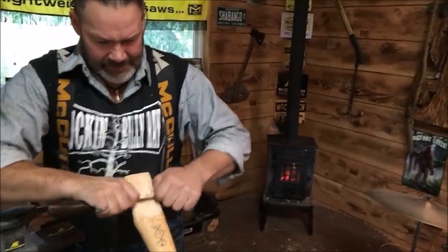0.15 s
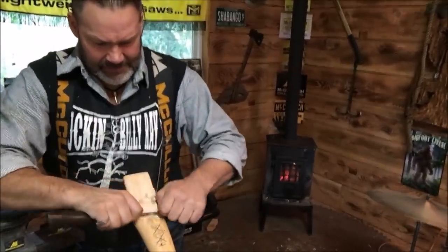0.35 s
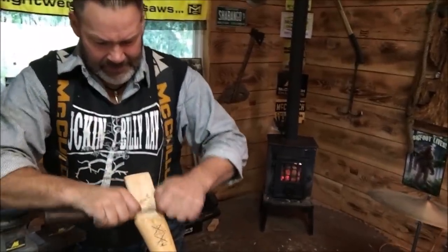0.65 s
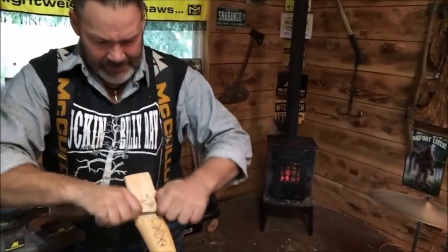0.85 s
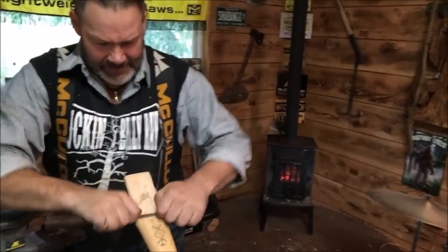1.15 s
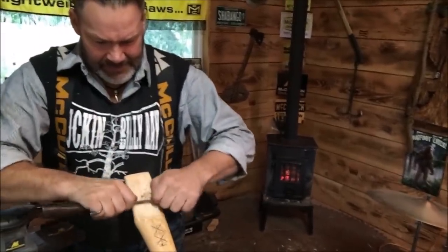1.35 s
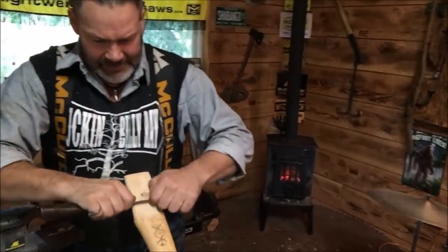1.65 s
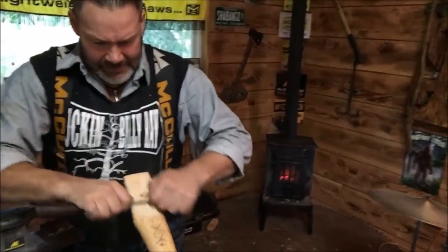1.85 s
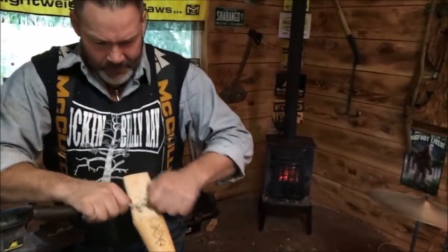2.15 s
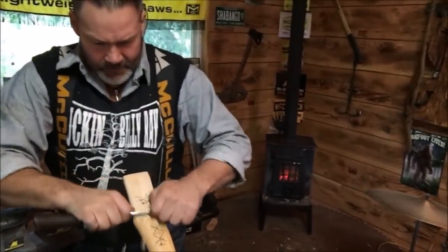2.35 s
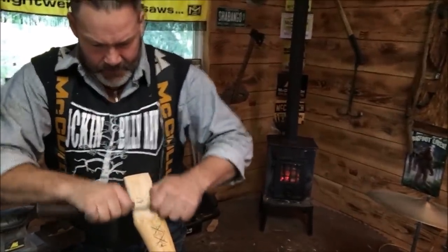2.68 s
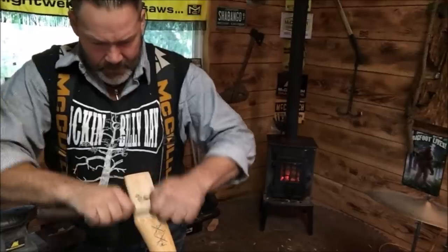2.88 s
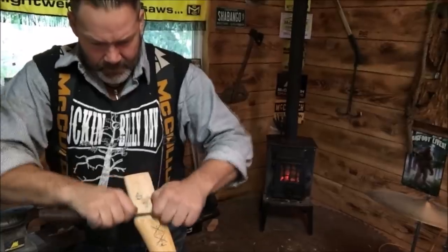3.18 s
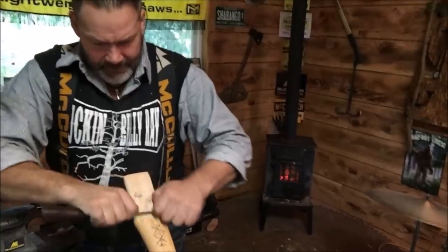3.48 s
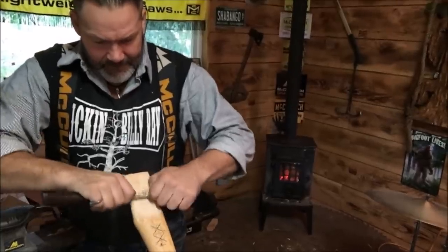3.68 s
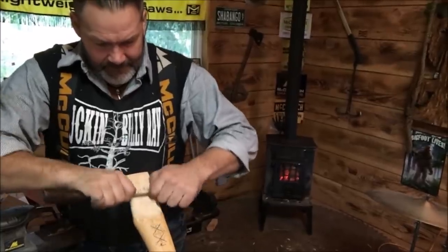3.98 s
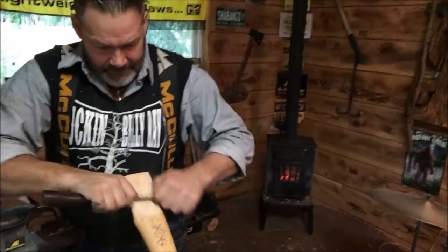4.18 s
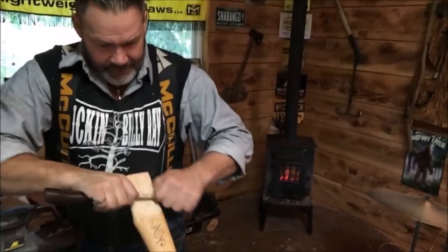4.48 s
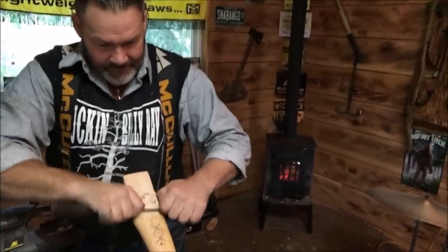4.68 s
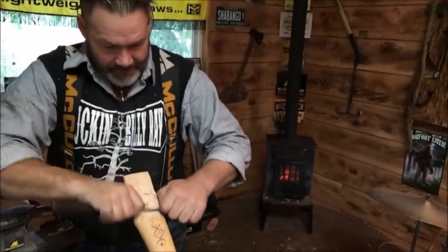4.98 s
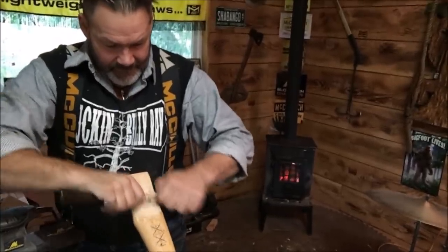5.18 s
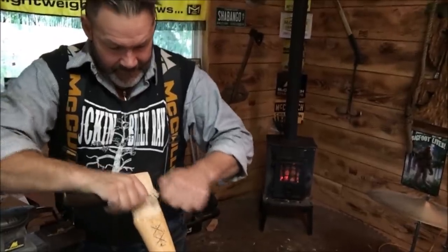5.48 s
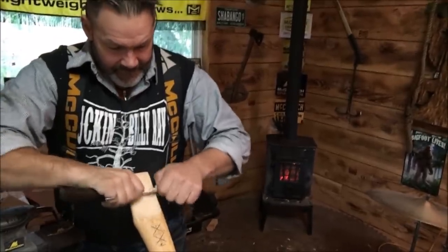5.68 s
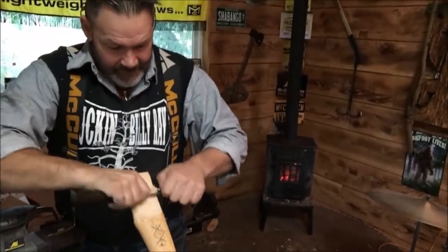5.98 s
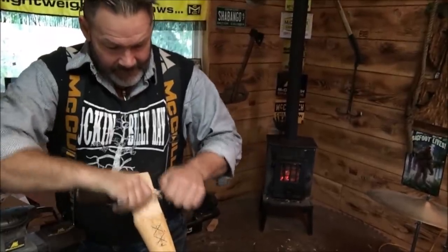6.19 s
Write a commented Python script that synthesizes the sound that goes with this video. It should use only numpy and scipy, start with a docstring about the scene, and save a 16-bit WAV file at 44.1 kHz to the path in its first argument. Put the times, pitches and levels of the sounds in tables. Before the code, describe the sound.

A steel scraper shaves a clamped wooden handle in quick, even, raspy strokes, with clicks and knocks over a faint low hum.

```python
"""A steel scraper shaves a clamped wooden handle in quick, even strokes inside a small timber workshop.
Pulls are dense, clumped fibre clicks that drive the ringing modes of handle and blade, plus fibre fizz.
Around them: set-down knocks, short stick-slip squeaks, catches that flick the blade, a faint early rub.
Sparse reflections carry the tail over a low hum of shaped noise."""
import sys
import numpy as np
from scipy import signal
from scipy.io import wavfile
from scipy.ndimage import uniform_filter1d

SR = 44100
rng = np.random.default_rng(int(sys.argv[2]) if len(sys.argv) > 2 else 0)


def dump(signal):
    """Clip the signal to [-1, 1] and save it as 16-bit WAV at the path in sys.argv[1]."""
    limited = np.clip(np.atleast_2d(signal).T, -1, 1)
    pcm = np.round(limited * 32767).astype(np.int16)
    wavfile.write(sys.argv[1], SR, pcm)


N = 279549
# Rows of the force array: deep handle, middle handle, blade, blade top, fizz, heard directly.


def gain_of(db):
    """Decibels to gain."""
    return 10 ** (np.asarray(db) / 20)


def unit(x):
    """Scales to energy 1."""
    return x / np.sqrt(np.sum(x ** 2) + 1e-30)


def unit_rms(x):
    """Scales to RMS 1."""
    return np.sqrt(len(x)) * unit(x)


def smooth_twice(x, first, second, first_axis=-1, second_axis=-1):
    """Two running means, lengths in samples or bins."""
    return uniform_filter1d(uniform_filter1d(x, first, first_axis), second, second_axis)


def read(points, hz):
    """Reads a table on a log-frequency axis."""
    f, value = np.transpose(points)
    return np.interp(np.log(hz + 1), np.log(f + 1), value)


def level_over_time(curve):
    """Reads a (time, level) table at every sample, in dB."""
    return np.interp(np.arange(N) / SR, *np.transpose(curve))


def add(mix, start_s, sound):
    """Mixes a sound in at start_s."""
    part = mix[..., round(start_s * SR):][..., :sound.shape[-1]]
    part += sound[..., :part.shape[-1]]


# Hum spectrum: (frequency [Hz], relative density [dB per Hz])
HUM_SPECTRUM = [(35, -43), (58, 4), (90, -8), (130, 0), (200, -6.5), (300, -12.5), (1000, -17.5),
                (3000, -28.5), (16000, -53)]
HUM_RMS_DB, HUM_PATCH_DB = -57.5, 3.7


def hum():
    """Steady low rumble of stove and building: shaped noise, slightly patchy in time and pitch."""
    frames, hz = N // 512 + 5, np.fft.rfftfreq(2048, 1 / SR)
    real, imag, patches = rng.standard_normal((frames, 1025, 3)).T
    patches = smooth_twice(patches, 3, 5, 0, 1)
    level_db = read(HUM_SPECTRUM, hz)[:, None] + HUM_PATCH_DB * patches / patches.std()
    noise = signal.istft((real + 1j * imag) * gain_of(level_db), nperseg=2048, noverlap=1536)[1][:N]
    return gain_of(HUM_RMS_DB) * np.sqrt(N) * unit(noise)


# Room decay: (frequency [Hz], t60 [s])
ROOM_DECAY = [(300, 0.22), (700, 0.42), (1030, 0.23), (1500, 0.44), (3000, 0.32), (6000, 0.28),
              (12000, 0.21)]
SET_CHANGES_PER_S = 2.3


def room(x, count=3):
    """Sparse random-sign reflections, t60 per band; several sets cross-fade in steady rotation."""
    out = np.zeros(N)
    place = np.cumsum(np.full(N, SET_CHANGES_PER_S / SR)) % count
    for k in range(count):
        taps = np.zeros(SR // 2)
        at = np.arange(220, len(taps) - 20, 16)
        taps[at + rng.integers(0, 16, len(at))] = rng.choice([-1., 1.], len(at))
        hz, t, z = signal.stft(taps, SR, nperseg=256)
        decay = gain_of(-60 * t / read(ROOM_DECAY, hz)[:, None])
        tail = signal.istft(z * decay, SR, nperseg=256)[1]
        away = abs((place - k + count / 2) % count - count / 2)
        fade = np.cos(np.pi / 2 * np.minimum(away, 1))
        out += signal.fftconvolve(x * fade, unit(tail))[:N]
    return out


GRIP_DETUNE, GRIP_DB = 0.008, 1.5  # spread of mode pitch [share] and strength [dB] as the grip shifts


def ring(modes, rise_s):
    """Response to one tap in one grip: modes alternate in sign; little radiates below the lowest."""
    t, chance = np.arange(8192) / SR, rng.standard_normal((len(modes), 2))
    tap = np.zeros(len(t))
    for k, (hz, db, t60_s) in enumerate(modes):
        decay = gain_of(db + GRIP_DB * chance[k, 0] - 60 * t / t60_s)
        tap += (-1) ** k * decay * np.sin(2 * np.pi * hz * (1 + GRIP_DETUNE * chance[k, 1]) * t)
    tap *= 1 - np.exp(-t / rise_s)
    highpass = signal.butter(4, .75 * modes[0][0], "high", fs=SR, output="sos")
    return unit(signal.sosfilt(highpass, tap))


def body(force, modes, rise_s, count=22):
    """Rings a set of modes; grip and contact point shift in even steps, so the modes shift a little."""
    out, place = np.zeros(N), np.linspace(0, count, N)
    for k in range(count + 1):
        span = np.flatnonzero(abs(place - k) < 1)
        fade = np.cos(np.pi / 2 * (place[span] - k)) ** 2
        add(out, span[0] / SR, signal.fftconvolve(force[span] * fade, ring(modes, rise_s)))
    return out


def shelf(x, hz, side, curve):
    """Lifts or lowers everything on one side of hz by a level curve."""
    part = signal.sosfiltfilt(signal.butter(2, hz, side, fs=SR, output="sos"), x)
    return x + (gain_of(level_over_time(curve)) - 1) * part


# Deep handle modes: (frequency [Hz], relative level [dB], t60 [s])
HANDLE_DEEP_MODES = [(129.6, -6, 0.11), (371.8, 2.5, 0.072), (431.3, 1, 0.086), (524.6, 7.5, 0.045),
                     (632, -6, 0.11), (698.6, -4.5, 0.11)]
# Drive below THUD_HZ: (time [s], level [dB])
THUD_LEVEL = [(0, -12), (2, 2.5), (6.34, -0.5)]
THUD_HZ, THUD_RISE_S = 486, 0.00033


def handle_deep(force):
    """Low modes of the handle; they build up while the clamp takes the blow."""
    return body(shelf(force, THUD_HZ, "low", THUD_LEVEL), HANDLE_DEEP_MODES, THUD_RISE_S)


RING_RISE_S = 0.00025  # middle handle and blade
# Middle handle modes: (frequency [Hz], relative level [dB], t60 [s])
HANDLE_MID_MODES = [(1153, 11.8, 0.049), (1146, 26.5, 0.0046), (1379.4, 14.17, 0.069),
                    (1597, 25.56, 0.0064), (1896, 16.7, 0.0091), (1862, 12, 0.028)]


def handle_mid(force):
    """Middle modes of the handle, as decaying sines."""
    return body(force, HANDLE_MID_MODES, RING_RISE_S)


# Blade modes: (frequency [Hz], relative level [dB], t60 [s])
BLADE_MODES = [(2215, -7.5, 0.12), (2407, -2, 0.2), (2397, 22, 0.0061), (2850, 6.5, 0.042),
               (3000, 13, 0.011), (3423, 12, 0.012), (3603, 9, 0.019), (3734, 4.5, 0.014),
               (4240, -4.5, 0.062), (4233, -0.5, 0.027)]


def blade(force):
    """Main modes of the steel blade, as decaying sines."""
    return body(force, BLADE_MODES, RING_RISE_S)


# Upper blade modes: (frequency [Hz], relative level [dB], t60 [s])
BLADE_TOP_MODES = [(4560, -4, .016), (4900, -3, .01), (5300, 1, .016), (5650, -1, .012), (6000, -2, .009)]


def blade_top(force):
    """Short upper modes of the blade, with a near-instant rise."""
    return body(force, BLADE_TOP_MODES, 1e-5)


def causal(points):
    """Minimum-phase click with the given spectrum."""
    hz = abs(np.fft.fftfreq(4096, 1 / SR))
    log_gain = np.log(gain_of(np.maximum(read(points, hz), -100)))
    return unit(np.fft.ifft(np.exp(log_gain - 1j * signal.hilbert(log_gain).imag)).real[:1024])


# Fizz spectrum: (frequency [Hz], relative density [dB per Hz])
FIZZ_SPECTRUM = [(2700, -30), (4300, 7), (6400, -2.5), (8600, -6.5), (10200, -17), (11800, -14),
                 (14000, -23), (16000, -16)]
# Drive above SHEEN_HZ: (time [s], level [dB])
SHEEN_LEVEL = [(0, 1.5), (2, 9), (3.4, 7), (4.4, 0.5), (6.34, 5.5)]
SHEEN_HZ = 7900


def fizz_air(force):
    """Fibre clicks radiate straight to air; bright spectrum, its treble rising and falling over time."""
    return signal.oaconvolve(shelf(force, SHEEN_HZ, "high", SHEEN_LEVEL), causal(FIZZ_SPECTRUM))[:N]


CLUMP_DB, PATCH_DB = 2.8, 2.8  # spread of fibre clumps in time, colour patches in time and pitch


def fibres(tears_per_s=1800, spread_db=2.5, rub_share=0.82, clump_db=CLUMP_DB):
    """Fibres tear as dense clicks of uneven size over a smoother rub, in clumps a few ms long."""
    sizes = gain_of(spread_db * np.minimum(rng.exponential(1, N), 5))
    tears = sizes * (rng.random(N) < tears_per_s / SR) * rng.choice([-1., 1.], N)
    clumps = smooth_twice(rng.standard_normal(N), 110, 110)
    rub = tears + rub_share * tears.std() * rng.standard_normal(N)
    return unit_rms(rub * gain_of(clump_db * clumps / clumps.std()))


def patchy(x):
    """Colour drifts in patches of some hundred Hz by some tens of ms, as the wood grain changes."""
    z = signal.stft(x, nperseg=256, noverlap=192)[2]
    patches = smooth_twice(rng.standard_normal(z.shape[::-1]).T, 5, 14, 0, 1)
    z = z * gain_of(PATCH_DB * patches / patches.std())
    return unit_rms(signal.istft(z, nperseg=256, noverlap=192)[1][:N])


# Light drag of the blade: (time [s], relative level [dB])
SLIDE_LEVEL = [(0, -60.5), (1.2, -76), (2.5, -74), (3, -67), (4.4, -116), (6.34, -99)]


def slide(force):
    """Faint, uneven rub of the blade on the wood, mostly early, fading to almost nothing later."""
    share_db = np.array([[-6], [0], [-1.5], [-12], [-12]])
    add(force[:5], 0, gain_of(level_over_time(SLIDE_LEVEL) + share_db) * fibres(clump_db=-1.5))


# Edge chatter on landing: (time [s], relative level [dB], slip rate [1/s], length [ms],
# overtone slope [dB per overtone], rattle above level [dB], strong-weak overtone above level [dB])
SQUEAK_EVENTS = [(0.082, -32.5, 1010, 8.6, -7, 9, -12), (0.395, -36.5, 1010, 6.2, -16, 18.5, 5),
                 (1.2766, -28.5, 1060, 12.4, -9.5, 5.5, -6.5), (1.572, -30.5, 1080, 10.4, -22, 4, -12),
                 (1.853, -34.5, 1065, 13.6, -21, 5.5, -22), (2.1494, -31, 1060, 7.8, -12, 8, -4.5),
                 (3.5857, -25.5, 1015, 15, -1.5, 4.5, -23), (4.1984, -28.5, 1020, 6.8, -2.5, 12, 5)]


def squeaks(force):
    """Stick-slip: a short wavering overtone stack, while uneven slips rattle handle and blade."""
    t = np.arange(1500) / SR
    for start_s, db, slip_hz, ms, slope_db, rattle_db, half_db in SQUEAK_EVENTS:
        waver = uniform_filter1d(rng.standard_normal(len(t)), 40) * np.sqrt(40)
        turns = slip_hz * t + .02 * waver
        stack = sum(gain_of(slope_db * k) * np.sin(2 * np.pi * (k + 1) * turns) for k in range(3))
        stack += gain_of(half_db) * np.sin(3 * np.pi * turns)  # strong and weak slips alternate
        swell = np.sin(np.pi * np.clip(1000 * t / ms, 0, 1) ** .8) ** .6
        late = .2 * uniform_filter1d(rng.standard_normal(len(t)), 30) * np.sqrt(30)
        slips = np.diff(np.floor(np.maximum.accumulate(turns + late)), prepend=-1)
        slips = slips * rng.uniform(0.36, 2.05, len(t)) * (1000 * t < ms)
        share_db = np.array([[-20], [0], [-9], [-20], [-22]])
        add(force[5], start_s, gain_of(db) * swell * stack)
        add(force[:5], start_s, gain_of(db + rattle_db + share_db) * slips)


PATTER_PER_MS = 0.035  # bounce strength against the tap


def blow(ms):
    """One contact: a sharp tap plus a dying patter of bounces that dominates long, soft contacts."""
    t = np.arange(1500) / SR
    patter = PATTER_PER_MS * ms * rng.standard_normal(len(t)) * np.exp(-1000 * t / max(ms, .2))
    return unit(patter + (t == 0))


# Blade touches wood: (time [s], relative knock level [dB], deep thud above it [dB],
# blade ring above it [dB], tick above it [dB], contact decay [ms])
LANDING_EVENTS = [(0.646, -28.5, -13, -18, -16.5, 4.5), (0.6773, -28.5, -10, -8.5, -12, 13),
                  (0.9782, -34.5, -7, -29, -14, 11), (1.215, -38.5, -6, -16, -13.5, 25),
                  (1.5358, -33, -9, -25, -14, 9.4), (1.82, -39, -10, -8, -10, 5.3),
                  (2.086, -48, -14, -9, -4, 14), (2.405, -36.5, -11, -14, -14, 4.3),
                  (2.444, -28.5, -21, -16, -18, 10), (2.7373, -27, -22, -21, -25, 0.47),
                  (3.0337, -22, -26, -11.5, -20.5, 1.7), (3.3104, -18.5, -19.5, -6, -23, 1.6),
                  (3.5252, -34, -32, -7, -14, 15), (3.9049, -19, -21, -10.5, -24, 1.2),
                  (4.5004, -16.5, -10.5, 1, -10, 1.7), (4.778, -14.5, -12.5, -2, -15, 1.95),
                  (5.0859, -15, -10, 0.5, -12.5, 0.86), (5.375, -22, -3, -10, -24, 4.7),
                  (5.6714, -15.5, -7, -9.5, -22, 0.46), (5.9519, -16, -8, -2.5, -19, 0.76),
                  (6.2445, -17.5, -4, 0.5, -15.5, 1.4)]


def landings(force, level_db=17, air_db=-9, air_db_per_ms=0.33):
    """Set-down knock on handle and blade; long grazing contacts hiss more."""
    for start_s, db, deep_db, blade_db, tick_db, ms in LANDING_EVENTS:
        hiss_db = tick_db + air_db + air_db_per_ms * ms
        share_db = np.array([[deep_db], [0], [blade_db], [tick_db], [hiss_db]])
        add(force[:5], start_s, gain_of(level_db + db + share_db) * blow(ms))


# Edge catches a fibre and snaps free: (time [s], relative blade ring [dB],
# handle ring above it [dB], deep thud above it [dB], tick above it [dB])
CATCH_EVENTS = [(0.1626, -9.5, -11, -10, -30), (0.18, -5, -33, -24, -31), (0.1994, -14, -32, -30, -43),
                (0.2134, -1, -17, -21, -16.5), (0.262, -25, -4, 6.5, -30), (0.4814, -5, -24, -3.5, -20),
                (0.5298, -9.5, -3.5, -2, -13), (0.7704, -10, -7, -12, -9), (0.798, -20, 0, -22, -30),
                (0.8539, -8.5, -6.5, -6.5, -14.5), (1.1152, -11, -12, -24, -17),
                (1.369, -16.5, -16, -25, -13), (1.4283, -10, -6, -7, -15), (1.706, -14.5, -16, -7, -39),
                (1.9832, -11, -37, -11.5, -12.5), (2.2415, -22, -20, -25, -24),
                (2.2921, -13.5, -30, -25, -14), (2.492, -6.5, -9, -17.5, -17), (2.57, -18, -30, -20, -14.5),
                (2.8482, -15, -35, -40, -16), (3.384, -28, -52, -25, -36), (3.419, -17, -30, -33, -10.5),
                (3.708, -19, -26, -29, -9), (4.0641, -19.5, -7.5, -5.5, -35), (4.598, -17.5, -22, -27, -23),
                (4.8865, -16, -7.5, -16, -47), (5.18, -28.5, 7.5, 2, 6.5), (5.475, -16.5, 0, 1, -8.5),
                (5.7508, -13.5, -3, 1, -7), (5.989, -17, -23, -29, -15), (6.0293, -15.5, -5.5, 0.5, -6.5),
                (6.275, -29, -14, 16.5, -26)]
SNAP_MS, TICK_MS = 1.6, 5.6  # fibres crackle a little longer than the snap


def catches(force, level_db=9, top_db=-6):
    """A snapping fibre flicks the blade and jolts the handle."""
    for start_s, db, handle_db, deep_db, tick_db in CATCH_EVENTS:
        share_db = np.array([[deep_db], [handle_db], [0], [tick_db + top_db], [tick_db]])
        snap, tick = blow(SNAP_MS), blow(TICK_MS)
        add(force[:5], start_s, gain_of(level_db + db + share_db) * np.array([snap, snap, snap, tick, tick]))


def resonate(x, hz, width_hz):
    """A resonance that follows the curve hz: shift down, smooth twice, shift back."""
    turn, r = np.exp(2j * np.pi * np.cumsum(hz) / SR), np.exp(-np.pi * width_hz / SR)
    return (turn * signal.lfilter([1], np.poly([r, r]), x / turn)).real


# Pulls: (start [s], length [s], digging-in [s], relative blade ring before dig-in loss [dB],
# its change by the lift [dB], mid-pull fizz [dB], mid-pull handle ring [dB], mid-pull shaving resonance [Hz])
PULL_EVENTS = [(0, 0.051, 0.042, -26, -46, -69.5, -61.5, 2490),
               (0.148, 0.099, 0.038, -23.5, -4.5, -38.5, -43.5, 3130),
               (0.468, 0.1, 0.031, -18, -37, -47, -51.5, 2830),
               (0.752, 0.099, 0.022, -33.5, -1, -49.5, -50.5, 2970),
               (1.054, 0.11, 0.0087, -32, -13, -51, -45.5, 3080),
               (1.352, 0.1, 0.014, -39.5, 5.5, -50, -45, 3080),
               (1.635, 0.12, 0.021, -40, -4, -54.5, -50, 2780),
               (1.923, 0.11, 0.017, -34, -7, -53.5, -54.5, 3320),
               (2.225, 0.11, 0.0017, -39, -6, -54, -42.5, 2550),
               (2.489, 0.13, 0.0077, -32.5, -22, -58.5, -48.5, 2480),
               (2.784, 0.13, 0.01, -40, -3, -51.5, -46.5, 2970),
               (3.077, 0.12, 0.038, -33, -24.5, -54, -54, 2630),
               (3.359, 0.11, 0.015, -36.5, -3, -48.5, -47.5, 3340),
               (3.654, 0.11, 0.019, -37.5, -5, -47.5, -50, 2990),
               (3.956, 0.14, 0.0072, -38.5, -4.5, -48.5, -49.5, 3340),
               (4.245, 0.13, 0.015, -37, -7, -46.5, -48.5, 3540),
               (4.546, 0.15, 0.0078, -35, -22.5, -50, -48, 3400),
               (4.835, 0.11, 0.011, -39.5, -13.5, -44.5, -43, 3050),
               (5.124, 0.11, 0.013, -42.5, -5, -47, -46.5, 2850),
               (5.409, 0.13, .012, -46.5, 4, -48, -46, 2730),
               (5.698, 0.12, 0.017, -41, -2, -48.5, -44.5, 3290),
               (5.981, 0.12, 0.0068, -38, -6.5, -50.5, -44.5, 3240),
               (6.262, 0.14, 0.011, -31.5, -23.5, -48.5, -40, 3090)]
BITE_S, LIFT_S = 0.0035, 0.02
DIG_DB, FIZZ_DIG_DB = -13.5, -9.5  # blade ring and fizz start this far down and grow as the edge digs in
HANDLE_FOLLOWS, HANDLE_DRIFT_DB = 0.75, 7.5  # share of blade change; extra rise over a pull
GLIDE, SHAVING_WIDTH_HZ = 0.15, 450  # glide: share of pitch over a pull
TONE_START_HZ, TONE_END_HZ, TONE_WIDTH_HZ = 505, 640, 110
MID_DB, RING_DB, SHAVING_DB, TOP_DB, TONE_DB = -4, -3, -1, -7, -2
FINE_SHARE = 0.12  # separate fine grain in the fizz


def pulls(force):
    """Tearing drives handle and blade; the curling shaving adds a gliding resonance, with a low tone."""
    grain, fine = patchy(fibres()), patchy(fibres())
    for start_s, length_s, dig_s, bite_db, change_db, fizz_db, handle_db, shaving_hz in PULL_EVENTS:
        first, count = round(start_s * SR), round(length_s * SR)
        coarse, small = grain[first:][:count], fine[first:][:count]
        t = np.arange(len(coarse)) / SR
        way = t / length_s - .5
        shallow = np.maximum(1 - t / dig_s, 0)

        blade_db = bite_db + change_db * (way + .5) + DIG_DB * shallow
        fizz_db = fizz_db + change_db * way + FIZZ_DIG_DB * shallow
        handle_db = handle_db + (HANDLE_FOLLOWS * change_db + HANDLE_DRIFT_DB) * way
        mid_db = 0.34 * handle_db + 0.61 * blade_db + MID_DB

        tone_hz = np.interp(t, [0, length_s], [TONE_START_HZ, TONE_END_HZ])
        fizz = unit_rms(coarse + FINE_SHARE * small)
        shaving = unit_rms(resonate(coarse, shaving_hz * (1 + GLIDE * way), SHAVING_WIDTH_HZ))
        tone = unit_rms(resonate(small, tone_hz, TONE_WIDTH_HZ))
        direct = gain_of(blade_db + SHAVING_DB) * shaving + gain_of(handle_db + TONE_DB) * tone

        drive = np.array([coarse, coarse, coarse, small, fizz, direct])
        level_db = [handle_db, mid_db, blade_db + RING_DB, fizz_db + TOP_DB, fizz_db, 0 * t]
        bite = np.clip(np.minimum(t / BITE_S, (length_s - t) / LIFT_S), 0, 1)
        add(force, start_s, gain_of(level_db) * bite * drive)


def scene():
    """Forces on handle, blade and fibres, each through its own response, then room and hum."""
    force = np.zeros((6, N))
    slide(force)
    squeaks(force)
    landings(force)
    catches(force)
    pulls(force)
    near = handle_deep(force[0]) + handle_mid(force[1]) + blade(force[2])
    near += blade_top(force[3]) + fizz_air(force[4]) + force[5]
    return (gain_of(-2.5) * near + gain_of(-10.5) * room(near) + hum())[None]


EDGE_HZ = 15750


def record(dry):
    """The band limit of the recorder: a linear-phase low-pass."""
    edge = signal.firwin(511, EDGE_HZ, window=("kaiser", 7), fs=SR)
    return signal.oaconvolve(dry, edge[None], "same")


dry = scene()
out = record(dry)
dump(out)
```